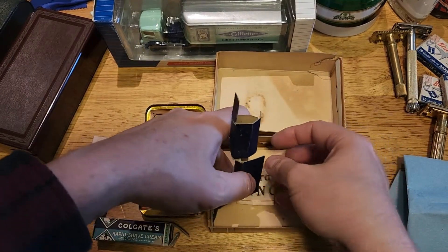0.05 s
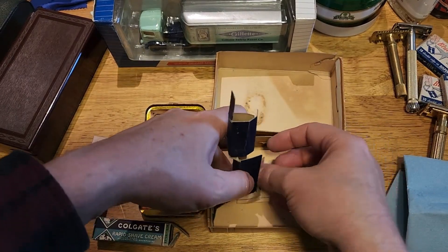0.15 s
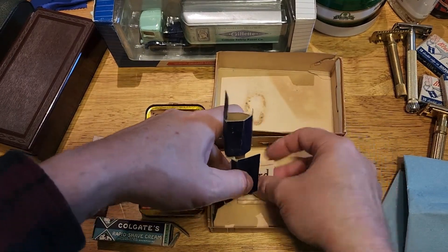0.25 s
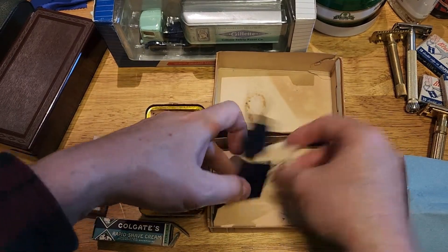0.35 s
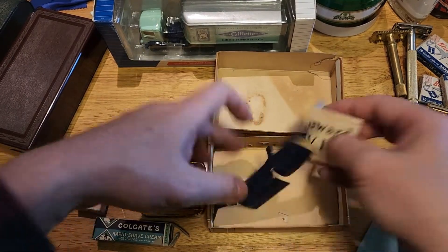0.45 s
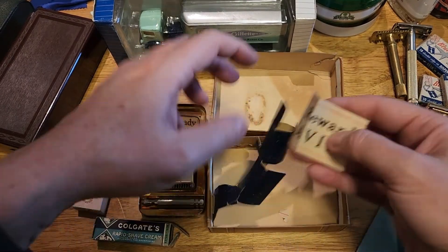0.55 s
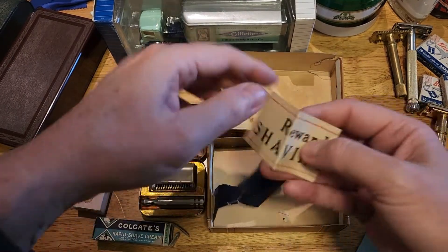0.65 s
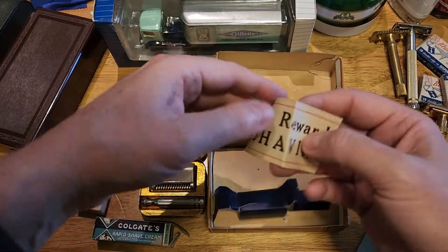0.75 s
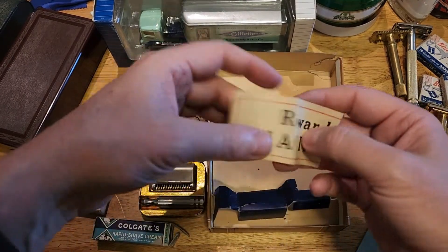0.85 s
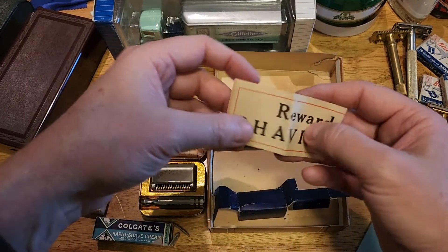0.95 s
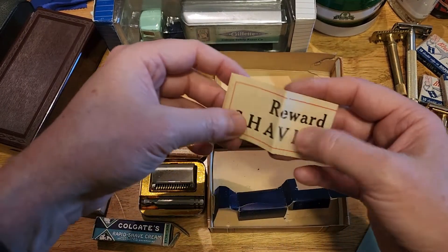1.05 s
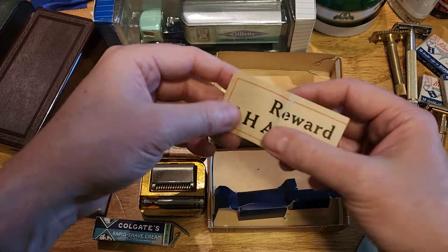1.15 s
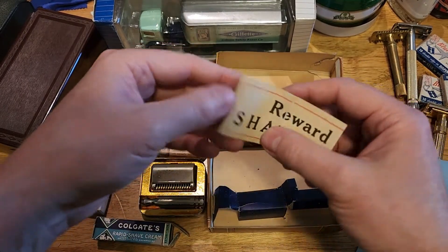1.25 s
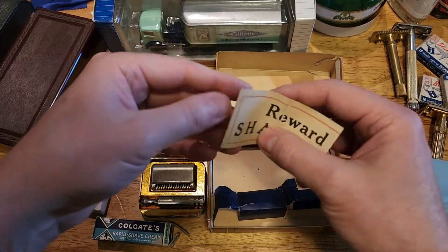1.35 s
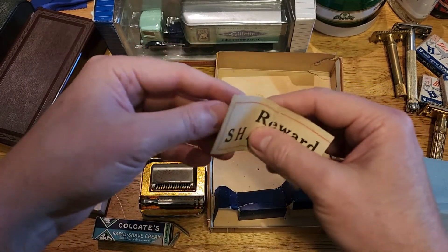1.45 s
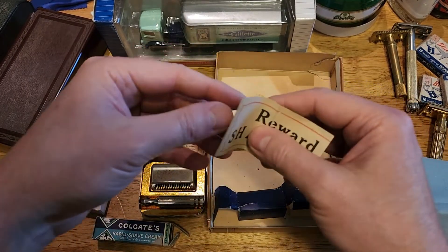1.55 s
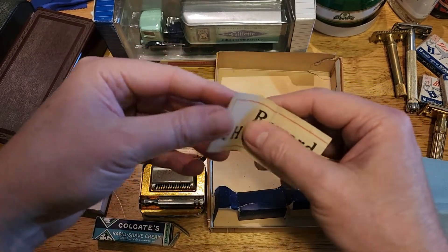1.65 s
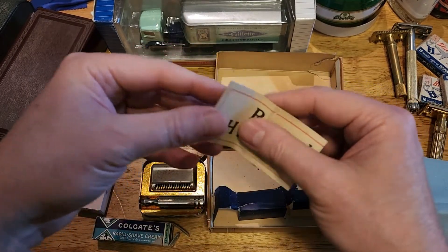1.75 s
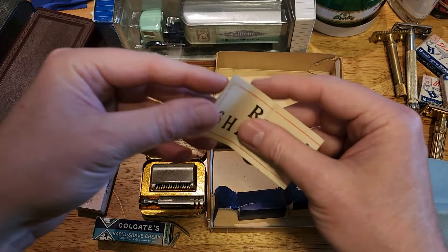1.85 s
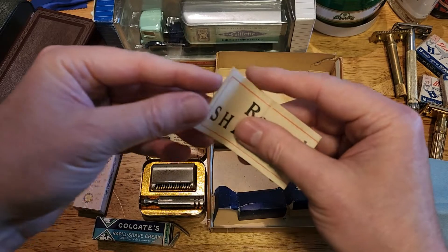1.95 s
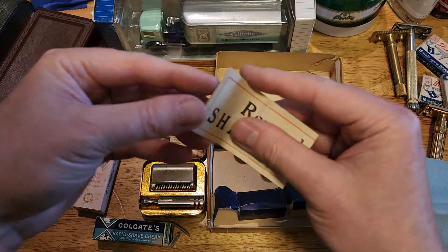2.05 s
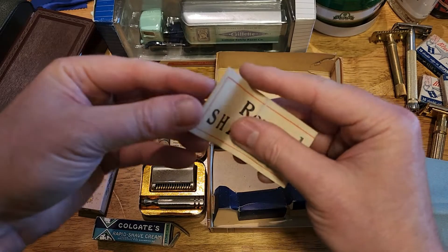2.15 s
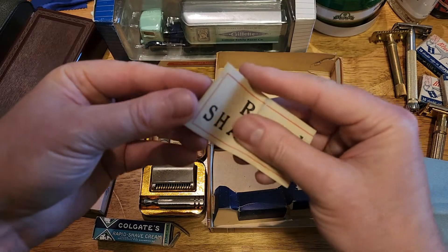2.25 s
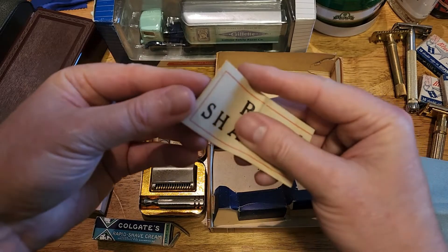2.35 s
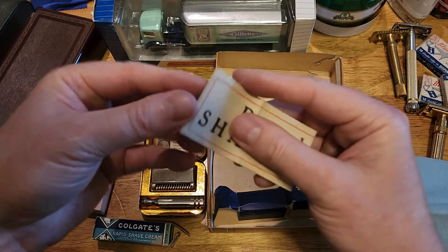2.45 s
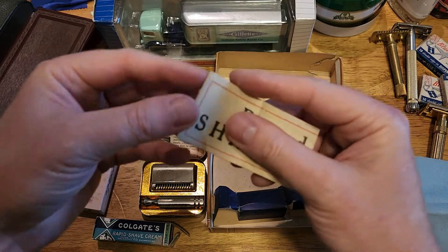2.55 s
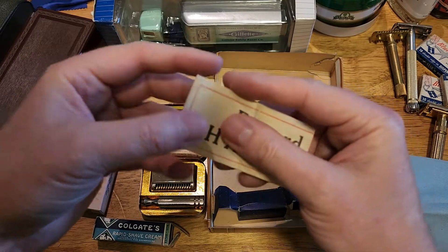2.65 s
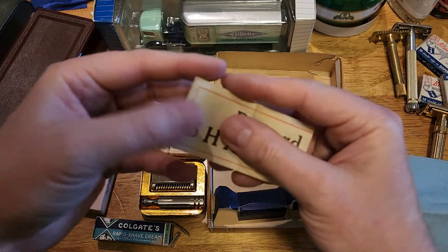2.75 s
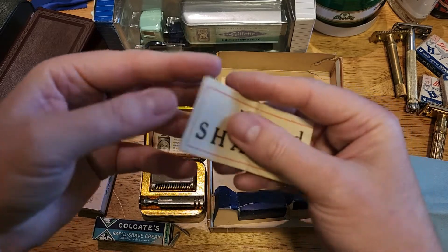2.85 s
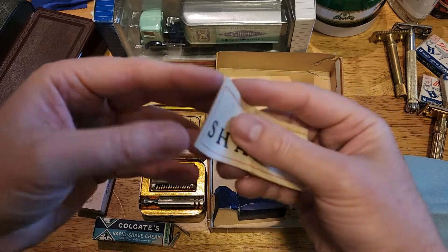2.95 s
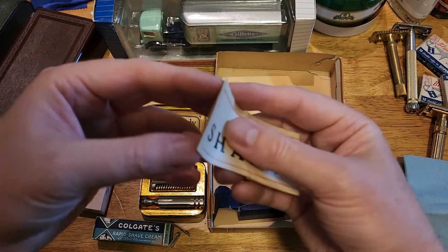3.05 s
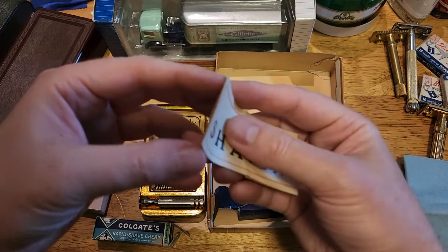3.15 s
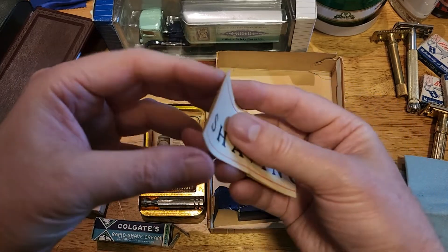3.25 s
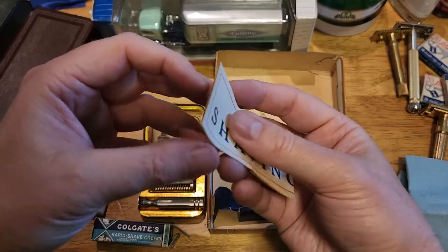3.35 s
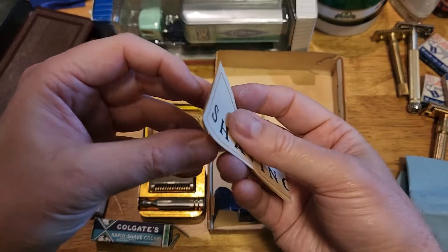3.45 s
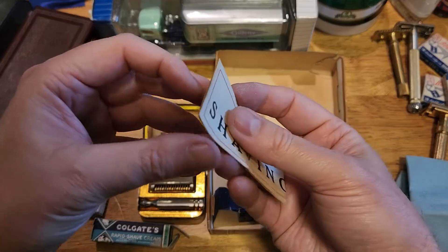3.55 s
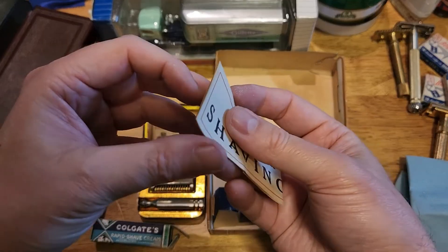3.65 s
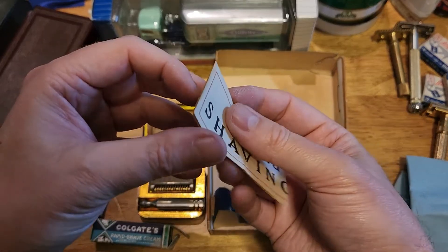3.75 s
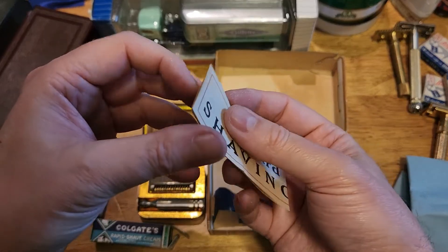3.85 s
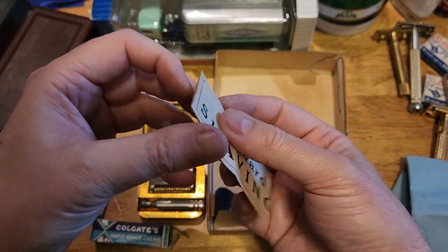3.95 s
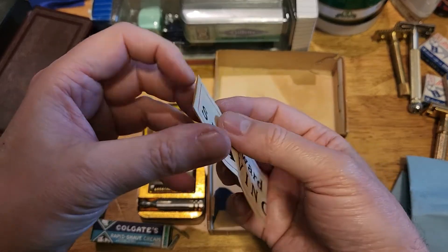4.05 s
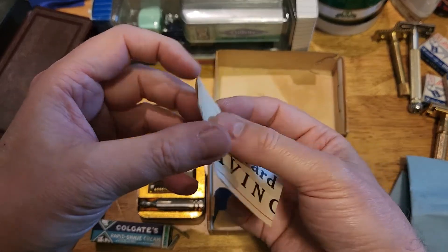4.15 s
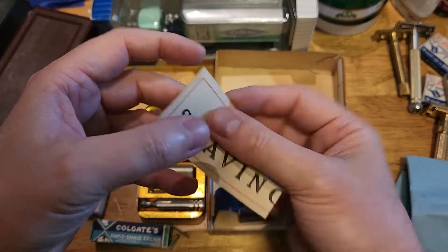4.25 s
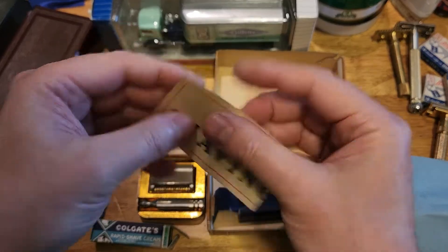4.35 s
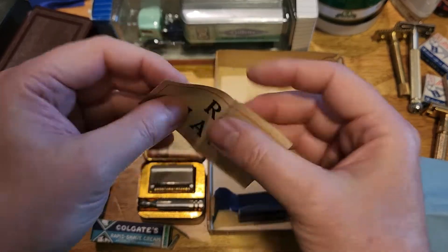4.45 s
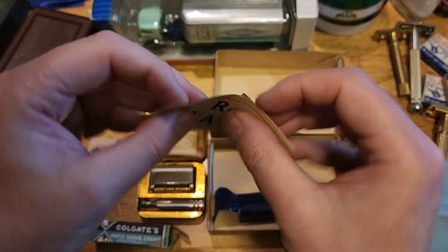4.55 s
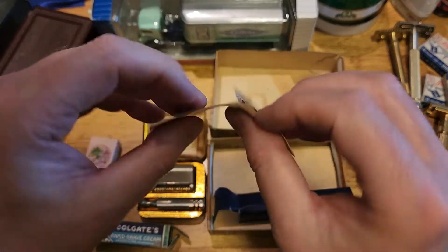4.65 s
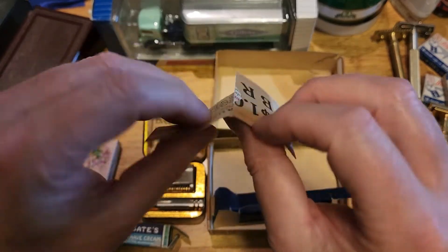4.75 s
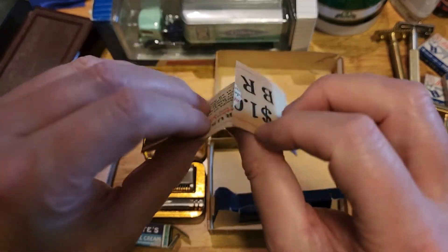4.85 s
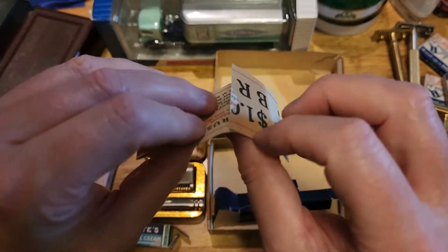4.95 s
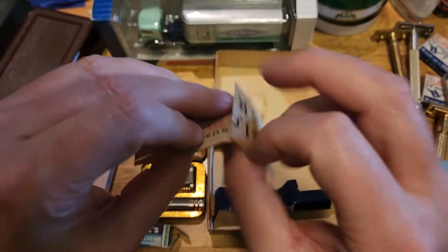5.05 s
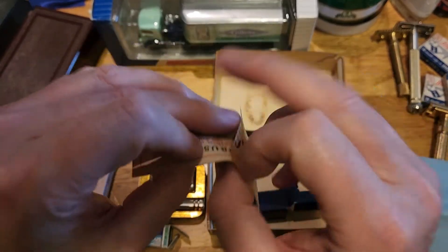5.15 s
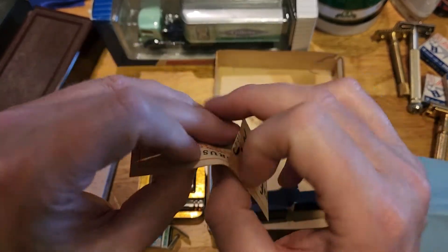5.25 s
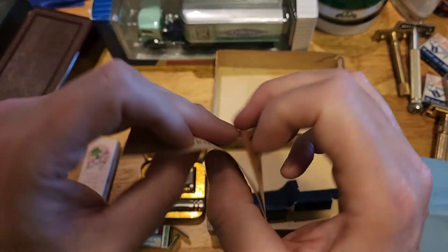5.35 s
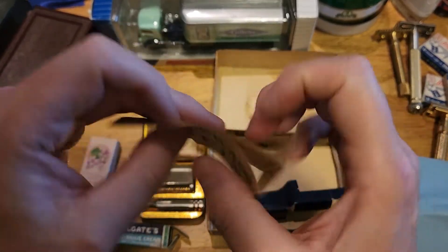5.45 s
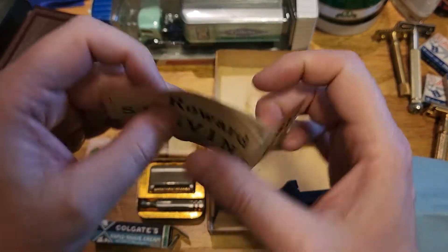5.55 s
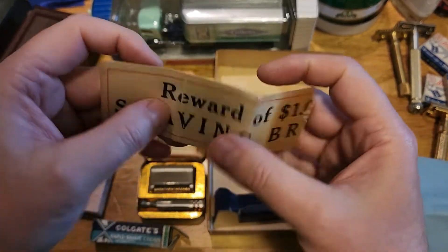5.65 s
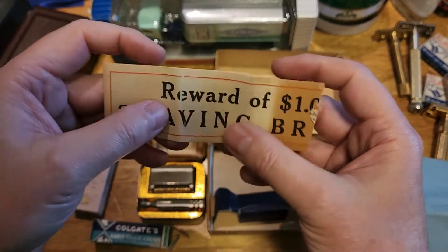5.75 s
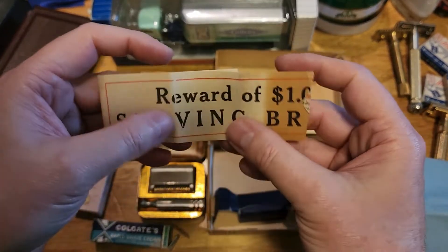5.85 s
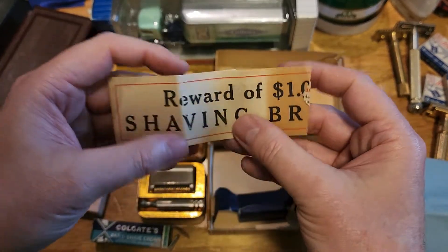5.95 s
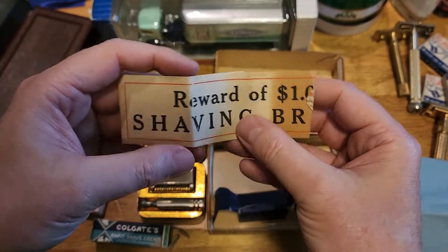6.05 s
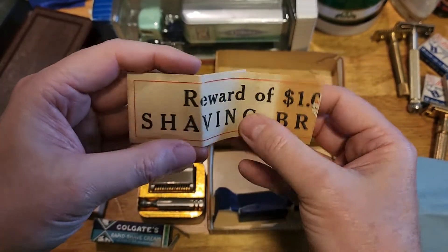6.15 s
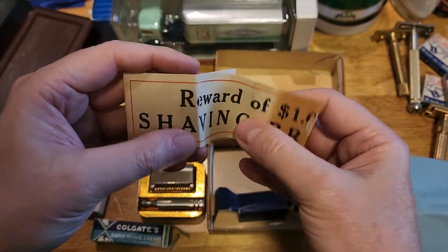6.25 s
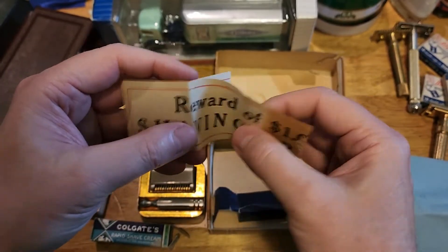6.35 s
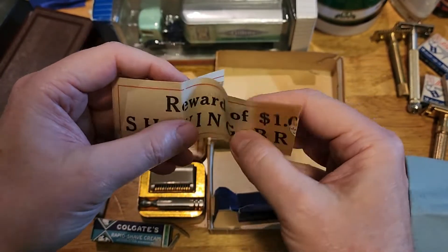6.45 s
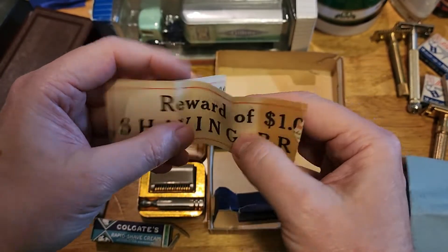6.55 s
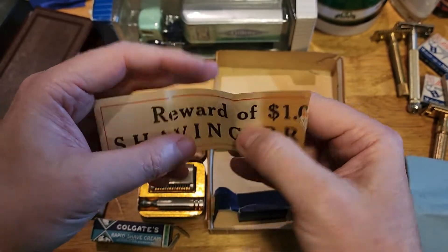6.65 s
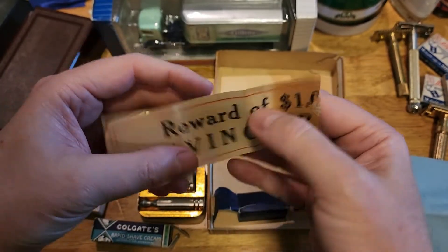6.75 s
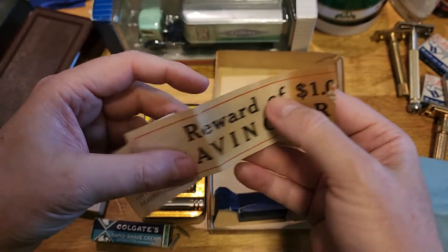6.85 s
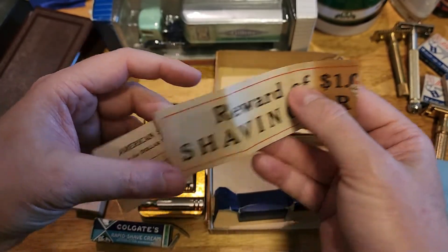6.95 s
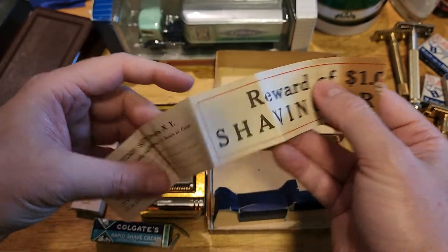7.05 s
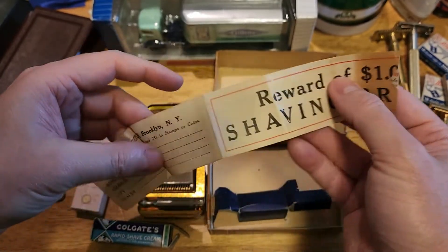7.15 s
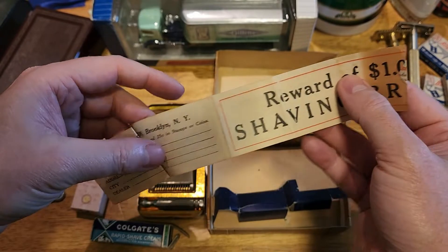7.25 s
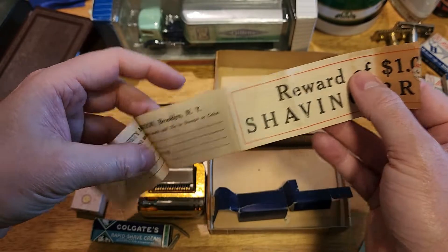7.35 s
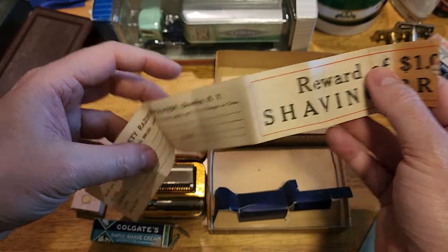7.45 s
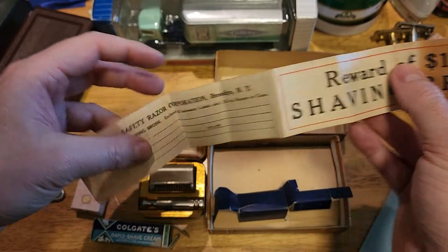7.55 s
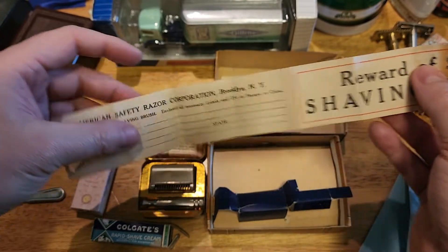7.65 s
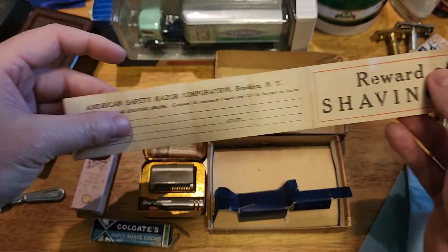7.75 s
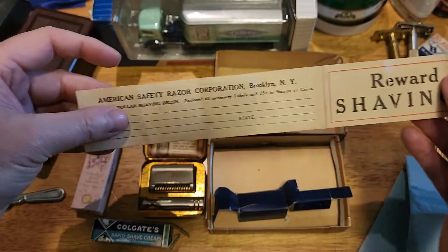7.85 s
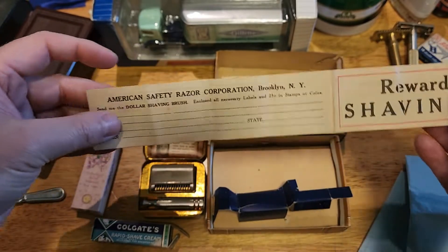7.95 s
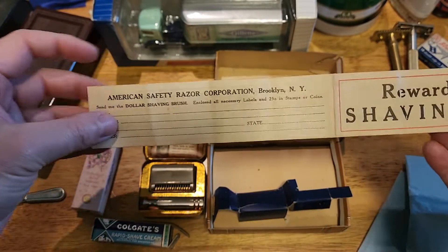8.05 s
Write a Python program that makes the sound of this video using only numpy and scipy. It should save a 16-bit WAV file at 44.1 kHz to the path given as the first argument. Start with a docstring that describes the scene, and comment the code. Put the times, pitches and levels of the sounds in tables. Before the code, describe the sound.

Close to the microphone in a quiet room, a cardboard insert taps lightly in a box at about 0.3 seconds and drops back with a sharper knock near 0.8. Around it, a folded paper leaflet crackles as it is lifted, with crisp snaps near 0.6, 0.9 and 1.3 seconds. Fingers then rub and slip softly over the sheet, almost stopping between 3 and 4 seconds. A crease clicks at 4 seconds and the unfolding gets busier, with dry rustling and short snaps around 4.3, 5.5, 5.7, 6.4 and 7 seconds, and a last one near 7.9. Underneath is a steady low room rumble and the hum of distant traffic through the walls. One passing engine enters at about 4.3 seconds as a deep wavering drone, is strongest from 6 to 7.3, then sinks in pitch and fades by 8 seconds.

```python
"""Unfolding a paper leaflet

Hands lift a leaflet from a cardboard box and unfold it close to a two-port microphone. Fingers catch
and slip on the sheet, creases snap and ring it, and a cardboard insert knocks back into the box.
Traffic drones through the walls of the quiet room; one engine swells and slows as it passes."""
import sys
import numpy as np
from scipy import signal
from scipy.fft import rfft, irfft, next_fast_len
from scipy.io import wavfile
from scipy.ndimage import uniform_filter1d, map_coordinates

SR = 44100
rng = np.random.default_rng(int(sys.argv[2]) if len(sys.argv) > 2 else 0)


def put_to_file(sound):
    """Save the sound as 16-bit audio at rate SR, in the file named by the first command-line argument."""
    columns = np.atleast_2d(sound).T  # one column per channel
    safe = np.clip(columns, -1, 1)
    whole_steps = np.round(safe * 32767)
    wavfile.write(sys.argv[1], SR, whole_steps.astype(np.int16))


N = 356767

# Finger strokes: peak t/s, rise/s, fall/s, skin level/dB, then body, scrape, hiss level/dB re skin
STROKES = [(0.018, 0.021, 0.06, -62.5, 12.5, -7, -3), (0.216, 0.055, 0.048, -58.5, 0.5, -5, -5),
           (0.295, .06, 0.046, -67, 12, 6, -1), (0.367, .045, 0.042, -61.5, 7.5, 1.5, -11),
           (0.443, 0.0065, .03, -56, -3, 5, 4), (0.459, .01, .008, -49.5, -12, 2.5, 11),
           (0.478, 0.028, 0.023, -51.5, -2.5, 3.5, 3), (0.538, 0.024, 0.024, -58.5, 9, -1, 4),
           (0.583, 0.019, 0.082, -50.5, -3, 3, -8), (0.632, .012, 0.011, -47.5, -2, 5.5, 2),
           (0.664, .04, 0.031, -66, 1, -15, 6), (0.795, 0.023, 0.05, -70, 21, 19.5, -19),
           (0.868, 0.3, .05, -63.5, 11, -8, -10), (0.918, .055, 0.076, -52, 6, 0.5, -3.5),
           (1.02, .08, 0.027, -65, 8, -8, -10), (1.095, 0.024, 0.074, -66, -5, -8, -10),
           (1.18, 0.083, .1, -65.5, -5, -5, -4), (1.279, 0.051, 0.096, -64.5, 10, 2, -3),
           (1.42, 0.076, 0.042, -58, 0.5, 0.5, -1.5), (1.5, .1, 0.05, -65.5, -2, -5, -7),
           (1.676, 0.05, 0.084, -63.5, 4, 1, -3), (1.8, 0.037, 0.23, -65, 5.5, -1.5, -7),
           (1.915, 0.11, 0.054, -65, 6.5, -7, -4), (2.01, 0.072, 0.016, -67.5, 10, -5, -10),
           (2.09, 0.04, 0.046, -66, 7, -2, -15), (2.51, 0.062, 0.041, -57.5, -8, -6.5, -6.5),
           (2.65, .095, 0.043, -64, 5.5, -8, -13), (2.83, 0.022, .1, -65.5, 0, -1.5, -21),
           (2.935, 0.076, .025, -61, -3, -9, -10), (3.065, 0.024, 0.098, -67, 7, -8, -8),
           (3.11, .04, .025, -71, -3, -1, -8), (3.317, 0.026, 0.028, -78.5, -3, 10, -26),
           (3.464, 0.04, 0.041, -72.5, 8, -1, -10), (3.981, 0.038, .05, -71.5, 13, 7, -23),
           (4.17, .012, 0.47, -69.5, 4, -5, -8), (4.272, 0.021, 0.034, -51, 3.5, -1.5, 0.5),
           (4.386, 0.093, 0.05, -59.5, 4.5, -7, -1), (4.52, 0.096, 0.063, -64, 4, -4.5, -3),
           (4.631, 0.11, 0.066, -62, -8, -10, -3), (4.76, 0.17, 0.083, -69.5, 6, -9, -6),
           (4.909, 0.047, .2, -69, 1, -9, -5), (5.076, 0.13, 0.2, -63, 1, -7, -5.5),
           (5.255, .02, 0.1, -66.5, 2, -10, -6), (5.37, 0.06, .1, -66.5, 5, -8, -8),
           (5.468, .035, 0.021, -41, -14, -8.5, -2), (5.505, 0.078, 0.072, -58.5, 2, -2.5, -8),
           (5.627, 0.09, .14, -65, 0, -15, -12), (5.743, 0.062, 0.066, -58, 6, -0.5, -11),
           (5.875, 0.031, 0.061, -57, -2.5, -5, -8.5), (6.047, 0.11, 0.17, -66, 1, -6, -21),
           (6.191, 0.04, 0.062, -63, 0.5, -8.5, -12.5), (6.318, 0.039, 0.13, -61.5, -18, -7.5, -12),
           (6.49, 0.2, 0.19, -57, -8, -9, -8), (6.542, 0.092, 0.042, -60, 12.5, 10, -2),
           (6.61, 0.041, 0.023, -55, 2.5, -2, -5), (6.708, 0.09, 0.36, -57.5, 2.5, -7.5, -6),
           (6.808, 0.046, 0.084, -54.5, -13, -0.5, -1), (6.95, 0.11, 0.11, -57.5, -11, -3, 2),
           (7.03, 0.042, .04, -52.5, 3, 2.5, -10), (7.152, .036, 0.32, -63.5, -4, -9, -9),
           (7.359, 0.04, 0.14, -57.5, -1, -2.5, -11), (7.45, 0.078, 0.077, -53.5, -1, -11, 2.5),
           (7.59, 0.085, 0.058, -64, -16, -9, -8), (7.673, 0.026, 0.06, -71, -5, -15, -8),
           (7.749, 0.018, 0.52, -57, -1.5, -5, -2)]
# Fingers holding still: skin, body, scrape, hiss level/dB
HOLD_DB = (-83, -68, -95.5, -92)


def finger_strokes():
    """Gains of skin, sheet body, scrape and hiss: strokes add in power over the resting hold."""
    t = np.arange(0, N / SR, 0.001)
    peak_s, rise_s, fall_s, skin_db, *relative_db = np.transpose(STROKES)
    band_db = skin_db + np.array([np.zeros_like(skin_db), *relative_db])
    shape_db = swell_db(t, peak_s[:, None], rise_s[:, None], fall_s[:, None], bluntness=1.05)
    powers = gain(2 * band_db) @ gain(2 * shape_db)
    return [np.interp(np.arange(N) / SR, t, np.sqrt(power + gain(2 * hold_db)))
            for power, hold_db in zip(powers, HOLD_DB)]


# Friction spectra: f/Hz, relative level/dB
SKIN_SPECTRUM = [(3500, -25), (5200, -9.5), (6500, -3.5), (8300, -5.5), (9200, -20), (11000, -55)]
BODY_SPECTRUM = [(500, -1), (1000, -4), (1500, -3.5), (2400, -8), (3200, -29), (5000, -54)]
SCRAPE_SPECTRUM = [(2000, -46.5), (3000, -3), (4000, -1), (5000, -5.5), (6500, -25)]
HISS_SPECTRUM = [(7500, -31), (9500, -1.5), (12000, -4.5), (15500, -4), (17000, 1)]
# Friction balance: f/Hz, L-R/dB
RUB_PAN = [(1000, 0), (3000, -0.5), (6000, -5.5), (12000, 1.5)]


def paper_rubbing(slips_per_s=4000, spread_db=1.0, clump_db=2.0, patch_db=3.0):
    """Skin catches and slips on the fibres in clumps; the bending sheet shifts its resonances."""
    slips = (rng.random(N) < slips_per_s / SR) * rng.choice([-1., 1.], N)
    slips *= gain(spread_db * np.minimum(rng.exponential(1, N), 4))
    clumps = gain(clump_db * unit_rms(uniform_filter1d(rng.standard_normal(N), size=300)))
    port_noise = 1.82 * rng.standard_normal((2, N))  # each port hears its own part of the wide sheet
    hz, _, spectra = signal.stft((unit_rms(slips) + port_noise) * clumps, SR, nperseg=512)
    patches = rng.standard_normal((spectra.shape[2], len(hz))).T
    patches = uniform_filter1d(uniform_filter1d(patches, size=7, axis=0), size=8, axis=1)
    spectra *= gain(patch_db * unit_rms(patches)) * pan(at_hz(RUB_PAN, hz))[:, :, None]
    friction = signal.istft(spectra, SR, nperseg=512)[1][:, :N]
    bands = (SKIN_SPECTRUM, BODY_SPECTRUM, SCRAPE_SPECTRUM, HISS_SPECTRUM)
    return sum(stroke * coloured(friction, band) for stroke, band in zip(finger_strokes(), bands))


# Snaps: t/s, level/dB, panel f/Hz, edge f/Hz, edge level/dB re panel, crack time/s,
# grit level/dB re edge, panel L-R/dB, edge L-R/dB
SNAPS = [(0.4436, -27, 2020, 4240, 10, 0.0018, -9, -3, -5),
         (0.4583, -38, 1070, 5170, 7, 0.0017, -11, -6, -13),
         (0.5603, -19.5, 3120, 4320, 22, 0.0016, 9, 4, -8.5),
         (0.5899, -27, 3100, 4170, 22, 0.00057, -13, -1, -5),
         (0.631, -33.5, 2940, 5000, 9, 0.0013, -5, -1, -4),
         (0.6577, -43, 2350.0, 6760, 10, 0.0033, -6, -2, -1),
         (0.8761, -31.5, 2130, 7400, 9, 0.002, 5, -4, -8), (0.9015, -33, 2090, 5560, 6, 0.002, -6, -2, -9),
         (0.9111, -20.5, 2160, 6320, 18, 0.0035, -5, -11, -6),
         (0.9175, -22.5, 2040, 5840, 5, 0.0016, 0, 2, -4), (0.9245, -26, 2050, 6440, 16, 0.0035, 6, 1, -6),
         (1.2653, -16.5, 1720, 4560, 1, 0.00063, -7.5, 6.5, -9.5),
         (3.9643, -22.5, 2235, 4050, -15.5, 0.00086, -14, 8, 27),
         (4.2771, -34.5, 2130, 8000, -4, 0.0017, -12, 0, -2),
         (4.2807, -29, 1220, 7570, 8, 0.0014, 3, 10, -5),
         (5.1092, -38, 1494, 5180.0, -12, 0.00065, -12, -4, -6),
         (5.122, -37, 1520, 4020, -16, 0.00095, -12, -1, -6),
         (5.4672, -39, 2130, 6270, 6, 0.0026, -7, -9, -5),
         (5.4751, -22, 1500, 5030, 11, 0.00061, 3, 0, -7.5),
         (5.497, -35, 2220, 6260, 10, 0.0027, -1, -7, -10),
         (5.5521, -35, 1830, 7000, 1.5, 0.00055, 3, -31, -9),
         (5.7171, -15.5, 2180, 6970, -1, 0.00081, 6, -5, -13.5),
         (5.718, -22.5, 1320, 3240, -1, 0.0014, -6.5, 0, -4.5),
         (5.728, -42, 2100.0, 7040.0, 9, 0.00083, -12, -4, 3),
         (6.4088, -30.5, 1350, 4440, -1, 0.0021, 3, -2, -13),
         (6.7767, -39, 2390, 3440, 2, 0.00094, -16, -4, -4),
         (6.8794, -27.5, 1870, 3490, 4.5, 0.00065, 4, -4, -6),
         (7.0161, -36, 1570, 7740, 10, 0.0021, -5, -10, -18),
         (7.0252, -38, 2850, 3695, 7, 0.00098, -9, -1, 4),
         (7.0288, -28.5, 1228, 3720, -17, 0.0018, -10, -1, -12),
         (7.0332, -24.5, 2970, 6190, 11, 0.0025, 0.5, 2, -6),
         (7.0439, -35.5, 1090, 3100, -9, 0.0014, -14, -3, -10),
         (7.048, -32, 690, 2000, -4, 0.0012, -15, 0, -4),
         (7.1363, -25.5, 1826, 3690, -0.5, 0.00052, 3, -4, -5),
         (7.3533, -40, 1410, 3900, 7, 0.00069, -12, 5, -2), (7.443, -42, 1980, 4000, -8, 0.0012, -6, 0, -4),
         (7.7416, -45, 1560, 6400, 18, 0.0033, 1, 3, -5), (7.836, -45, 1621, 4030, -23, 0.0012, -10, -4, 0),
         (7.8981, -21.5, 1526, 5500, -13, 0.00086, -12, -4, -3)]
# Sheet modes: frequency ratio, relative level/dB
SHEET_MODES = [(0.333, -12), (.47, -8.5), (0.652, -3.5), (0.828, -4), (1.006, 5.5), (1.2, -13), (1.45, -4)]


def crease_snaps():
    """Creases snap and briefly ring the sheet."""
    return strikes(SNAPS, SHEET_MODES, ring_db=-13.5, ring_t60_s=0.048, grit_hz=2900, thud_db=-22.0)


# Knocks: t/s, level/dB, panel f/Hz, edge f/Hz, edge level/dB re panel, contact time/s,
# grit level/dB re edge, panel L-R/dB, edge L-R/dB
KNOCKS = [(0.2647, -27, 907, 2500.0, -6, 0.0011, 2, -3, -4),
          (0.2686, -20, 1297, 3490, -20.5, 0.001, 7, 2, -18.5),
          (0.2753, -28.5, 1390, 3080, -30, 0.0025, -12, -4, -3),
          (0.3026, -33, 754, 2910.0, -20, 0.0011, -7, 1, 1),
          (0.3507, -33, 1720, 2500.0, -31, 0.0014, -12, -2, -1),
          (0.5235, -29, 1480, 3680, -16, 0.0013, 10, -1, -6),
          (0.639, -40.5, 706, 2500, -20, 0.002, -12, 1, 0), (0.7034, -43, 660, 4510, -23, 0.003, -12, 1, 1),
          (0.7796, -9.5, 1441, 2790, -16, 0.0021, -6.5, -2, -9),
          (0.7909, -31, 1500, 2520, -18, 0.00052, -8, 10, -2),
          (0.8386, -22.5, 1446, 2730, -27, 0.0013, -14, -3, 1),
          (0.8946, -34.5, 660, 6340.0, -23, 0.0004, -12, -1, -6)]
# Cardboard modes: frequency ratio, relative level/dB
BOX_MODES = [(0.464, -5.5), (.55, -3.5), (.7, -54), (.9, -31), (1.012, 10.5), (1.27, 3), (1.46, 4.5)]


def box_knocks():
    """The insert drops into the box and rings the cardboard."""
    return strikes(KNOCKS, BOX_MODES, ring_db=-11, ring_t60_s=0.066, grit_hz=2100, thud_db=-21.5)


def strikes(rows, modes, ring_db, ring_t60_s, grit_hz, thud_db,
            thud_hz=595, thud_t60_s=0.037, top_hz=8120):
    """Each blow drives a panel and an edge patch over a dull thud; a faint rattling ring dies away."""
    length = 2048
    out, t = np.zeros((2, N + length)), np.arange(length) / SR
    ratios, mode_db = np.transpose(modes)[:, :, None]
    noise = rng.standard_normal((len(rows), 3, length))
    grits = signal.lfilter(*signal.butter(2, [grit_hz, top_hz], "bandpass", fs=SR), noise[:, :2])
    rattles = uniform_filter1d(noise[:, 2], size=60)
    thud = gain(thud_db - 60 * t / thud_t60_s) * np.sin(2 * np.pi * thud_hz * t)
    for row, grit, rattle in zip(rows, grits, rattles):
        start_s, level_db, panel_hz, edge_hz, edge_db, contact_s, grit_db, panel_pan, edge_pan = row
        contact = t / contact_s
        ring = (1 + 0.98 * unit_rms(rattle)) * gain(ring_db - 60 * t / ring_t60_s)
        envelope = np.tanh(2.12 * contact) * (np.exp(-(contact / 2) ** 3) + ring)
        panel, edge = (-unit_rms((gain(mode_db) * np.sin(2 * np.pi * ratios * hz * t)).sum(0))
                       for hz in (panel_hz, edge_hz))
        edge = edge + gain(grit_db) * unit_rms(grit + grit[0])  # grit partly shared by the ports
        edge *= gain(edge_db - 45 * t / ring_t60_s)  # the small patch dies sooner
        crest = 2 * np.sqrt(1 + gain(2 * edge_db) * (1 + gain(2 * grit_db)))
        blow = pan(panel_pan)[:, None] * panel + pan(edge_pan)[:, None] * edge
        start = round(start_s * SR)
        out[:, start:start + length] += gain(level_db) * (envelope * blow / crest + thud)
    # the microphone rolls off the top octave, dulling the snaps and knocks
    dull = signal.sosfilt(signal.butter(6, top_hz, fs=SR, output="sos"), out[:, :N])
    return dull + gain(-16.5) * out[:, :N]


# Arrival at the ports: t/s, left lead/s
LEFT_LEAD = [(0, .00015), (5.45, .00012), (5.6, .00008), (7.1, .00005), (7.4, -.00001), (8.09, -.00003)]


def hand_drift(hands):
    """The hands drift across the microphone, changing the delay between its ports."""
    right_samples = np.arange(N) - SR * over_time(LEFT_LEAD)
    return np.array([hands[0], map_coordinates(hands[1], [right_samples], order=5)])


# Engine firing rate: t/s, f/Hz
FIRING_HZ = [(4.3, 82.6), (5.0, 80), (5.8, 77.5), (6.4, 75.06), (6.85, 70.97), (7.3, 66.1), (7.7, 62.3),
             (7.97, 59.9), (8.09, 56.1)]
# Firing tone and its octave: t/s, level/dB
FIRING_DB = [(4.3, -68), (4.33, -33.5), (4.39, -29.5), (4.55, -40), (4.67, -31), (4.82, -45), (4.92, -38.5),
             (5.05, -61), (5.13, -42.5), (5.31, -39), (5.43, -43.5), (5.5, -38), (5.6, -44.5),
             (5.72, -35.5), (5.8, -38.5), (5.96, -27), (6.42, -19), (6.63, -22.5), (6.73, -32.5),
             (6.84, -22.5), (7.23, -24), (7.36, -28), (7.7, -36), (7.89, -38), (8.01, -46), (8.09, -46)]
OCTAVE_DB = [(4.3, -67), (5.1, -64), (5.4, -54), (5.85, -54), (5.95, -61.5), (7.2, -58.5), (7.3, -47),
             (7.66, -39.5), (7.76, -51.5), (7.83, -35.5), (8.0, -36), (8.04, -52), (8.09, -35)]


def passing_engine():
    """A slowing engine's firing tone and octave, wavering in level through the walls."""
    phase = 2 * np.pi * (np.cumsum(over_time(FIRING_HZ)) / SR + rng.random())
    firing = gain(over_time(FIRING_DB, left=-120)) * np.sin(phase)
    octave = gain(over_time(OCTAVE_DB, left=-120)) * np.sin(2 * phase)
    return np.sqrt(2) * (firing + octave)


# Traffic hums: peak t/s, rise/s, fall/s, f/Hz, glide/(Hz/s), level/dB
HUMS = [(0.089, 0.19, 0.046, 80.5, 10, -41.5), (0.501, 0.25, 0.17, 100.3, 32, -42),
        (0.702, 0.17, 0.24, 74.7, 35, -51), (1.451, 0.62, 0.43, 83.4, 2.5, -39.5),
        (1.701, 0.46, 1, 97.5, 1, -44.5), (1.901, 0.18, 0.19, 206.7, 5, -46.5),
        (2.12, .08, .1, 188, -24, -55.5), (2.242, 0.27, 0.073, 86.8, 1, -42),
        (2.772, 0.21, 0.25, 68.4, -9.5, -37.5), (3.141, 0.045, 0.37, 74.1, 10, -41.5),
        (3.751, 0.61, 0.26, 79, 6, -49), (4.149, 0.14, 0.13, 77.6, 0, -44.5),
        (4.199, 0.37, .1, 99.4, 5, -48.5)]


def far_traffic():
    """Distant vehicles hum, each a gliding tone under one swell."""
    t, out = np.arange(N) / SR, np.zeros(N)
    for peak_s, rise_s, fall_s, hz, glide_hz_per_s, level_db in HUMS:
        envelope = gain(level_db + swell_db(t, peak_s, rise_s, fall_s, bluntness=1.66))
        cycles = rng.random() + (hz + glide_hz_per_s * (t - peak_s) / 2) * (t - peak_s)
        out += envelope * np.sin(2 * np.pi * cycles)
    return np.sqrt(2) * out


# Room decay: f/Hz, T60/s
ROOM_T60 = [(300, 0.37), (1500, 0.18), (5000, 0.13), (12000, 0.079)]


def room_reflections(hands):
    """Sparse echoes of random sign; the treble dies first."""
    taps = np.zeros((2, 22000))
    arrivals = np.arange(120, 21960, 20) + rng.integers(0, 20, (2, 1092))
    np.put_along_axis(taps, arrivals, rng.choice([-1., 1.], arrivals.shape), 1)
    hz, t, spectra = signal.stft(taps, SR, nperseg=256)
    decay = gain(-60 * t / at_hz(ROOM_T60, hz)[:, None])
    tail = signal.istft(spectra * decay, SR, nperseg=256)[1]
    return signal.fftconvolve(hands.mean(0)[None], tail / np.linalg.norm(tail[0]), axes=1)[:, :N]


# Room noise spectrum: f/Hz, relative level/dB
ROOM_SPECTRUM = [(12, -54), (20, -9), (48, -14), (60, -9), (81, 3.5), (120, -15.5), (293, -14), (367, -23),
                 (499, -28), (698, -22), (780, -33.5), (1120, -29.5), (1860, -41), (7730, -61.5),
                 (16000, -84.5)]
# Room modes: f/Hz, width/Hz, lift/dB
ROOM_MODES = [(107.2, 4.4, 7), (124.4, 8.4, 15), (200.65, 7.2, 12), (297, 11.4, 7), (328, 9.7, 12.5),
              (624, 130, 3)]
# Likeness at the ports: f/Hz, correlation
ROOM_CORRELATION = [(60, 1), (180, 0.97), (550, 0.82), (1650, 0.3), (4970, 0.02), (15000, 0.06)]
# Room noise balance: f/Hz, L-R/dB
ROOM_PAN = [(60, -0.5), (240, -0.5), (950, 0), (3770, 3), (15000, -2.5)]


def room_tone(level_db=-44.5, patch_db=1.36):
    """Low noise lifted by room modes, its colour drifting; alike at both ports in the bass."""
    frames, hz = N // 1024 + 5, np.fft.rfftfreq(4096, 1 / SR)
    left_re, left_im, own_re, own_im, patches = rng.standard_normal((frames, len(hz), 5)).T
    patches = unit_rms(uniform_filter1d(uniform_filter1d(patches, size=14, axis=0), size=5, axis=1))
    correlation = at_hz(ROOM_CORRELATION, hz)[:, None]
    left = left_re + 1j * left_im
    right = correlation * left + np.sqrt(1 - correlation ** 2) * (own_re + 1j * own_im)
    modes_db = sum(lift_db / (1 + (2 * (hz - mode_hz) / width_hz) ** 2)
                   for mode_hz, width_hz, lift_db in ROOM_MODES)
    colour_db = (at_hz(ROOM_SPECTRUM, hz) + modes_db)[:, None] + patch_db * patches
    spectra = np.array([left, right]) * pan(at_hz(ROOM_PAN, hz))[:, :, None] * gain(colour_db)
    return gain(level_db) * unit_rms(signal.istft(spectra, nperseg=4096, noverlap=3072)[1][:, :N])


def gain(db):
    """Decibels to amplitude."""
    return 10 ** (np.asarray(db) / 20)


def pan(balance_db):
    """Left and right gains for an L-R balance."""
    return np.array([gain(balance_db / 2), gain(-balance_db / 2)])


def unit_rms(x):
    """Scales to rms 1."""
    return x / np.sqrt(np.mean(x ** 2) + 1e-20)


def over_time(table, left=None):
    """Reads a time table at every sample."""
    return np.interp(np.arange(N) / SR, *np.transpose(table), left=left)


def at_hz(table, hz):
    """Reads a table on a log-frequency axis."""
    table_hz, values = np.transpose(table)
    return np.interp(np.log(hz + 1), np.log(table_hz + 1), values)


def coloured(x, spectrum):
    """Filters by a spectrum table, to rms 1."""
    size = next_fast_len(N)
    response = gain(at_hz(spectrum, np.fft.rfftfreq(size, 1 / SR)))
    return unit_rms(irfft(rfft(x, size) * response, size)[..., :N])


def swell_db(t, peak_s, rise_s, fall_s, bluntness):
    """Climbs 15 dB over rise_s to 0, drops 15 dB over fall_s; bluntness above 1 flattens the top."""
    return -15 * np.maximum((peak_s - t) / rise_s, (t - peak_s) / fall_s) ** bluntness


def scene():
    """Close paper and cardboard with their reflections, over traffic and room tone."""
    hands = box_knocks() + crease_snaps() + paper_rubbing()
    traffic = passing_engine() + far_traffic()
    traffic_side = gain(-24.5) * np.outer([1, -1], np.roll(traffic, 150))  # the ports differ slightly
    return hand_drift(hands) + gain(-14.0) * room_reflections(hands) + traffic + traffic_side + room_tone()


def record(dry):
    """The recorder's band limit."""
    lowpass = signal.firwin(511, 15800, window=("kaiser", 9), fs=SR)
    return signal.oaconvolve(dry, lowpass[None], "same")


dry = scene()
out = record(dry)
put_to_file(out)
```